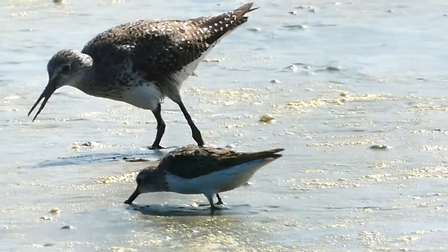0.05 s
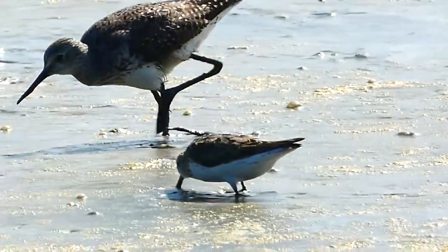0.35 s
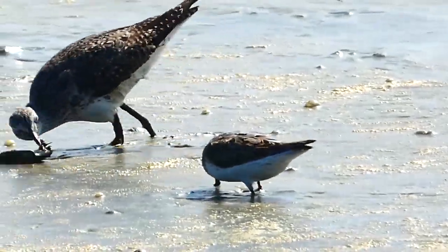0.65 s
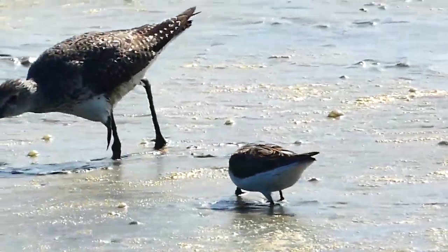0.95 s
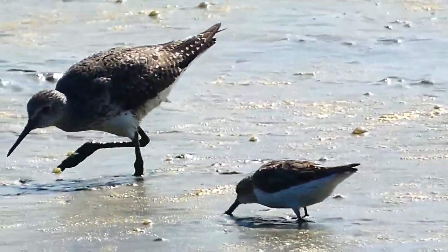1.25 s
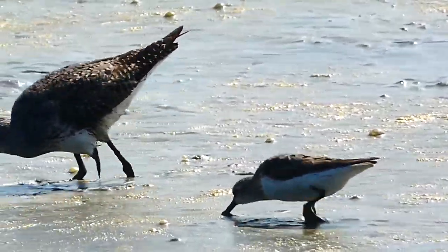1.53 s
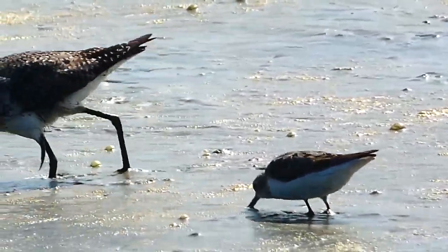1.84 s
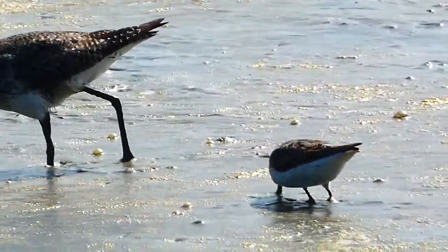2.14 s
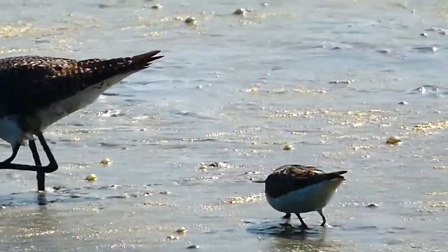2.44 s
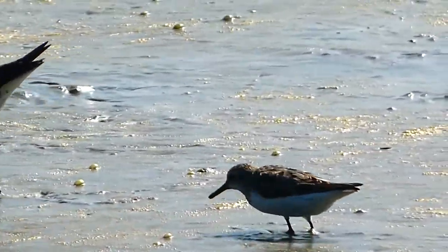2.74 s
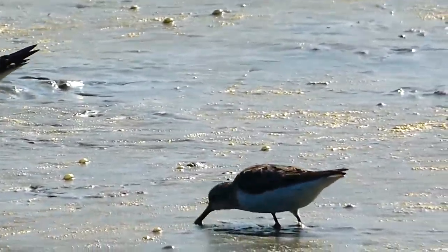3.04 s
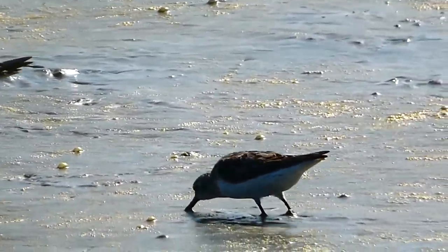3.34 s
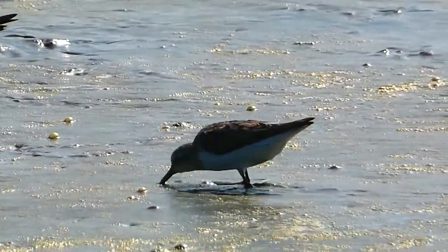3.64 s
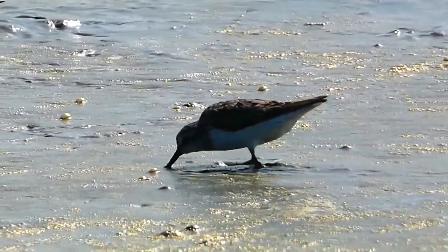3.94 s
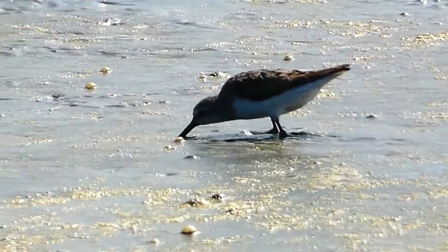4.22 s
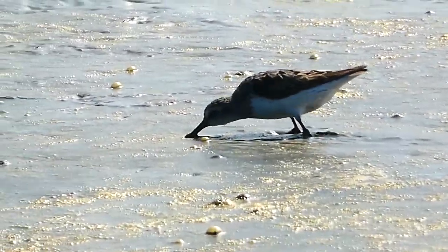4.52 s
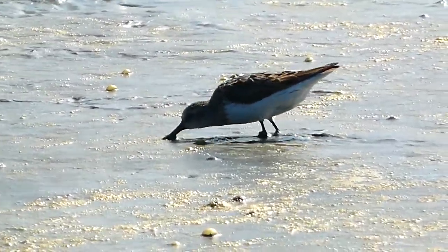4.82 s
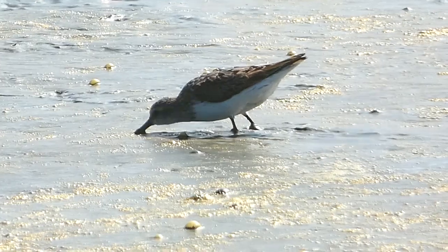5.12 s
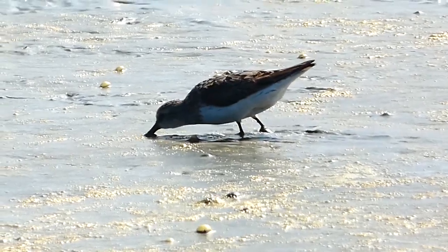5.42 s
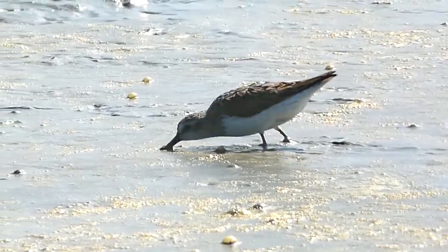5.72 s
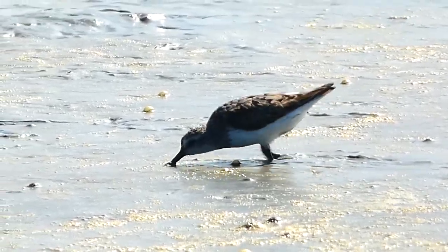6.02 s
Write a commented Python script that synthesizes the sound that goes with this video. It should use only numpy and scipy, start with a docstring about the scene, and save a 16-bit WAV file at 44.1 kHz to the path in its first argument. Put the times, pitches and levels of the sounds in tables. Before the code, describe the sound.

Gusty wind rumbles and thumps on the microphone over a soft hiss, while a distant bird gives faint, buzzy falling whistles.

```python
"""Wind buffets a microphone on an open mudflat: gusts rumble, and their eddies (small swirls of air)
land as low thumps and sharp puffs. Behind them, wind hisses in vegetation and a hollow drone hums like
far traffic. All of these are shaped noise. A distant bird gives buzzy falling whistles that echo
faintly off the shore. A soft knock, a dry tick and a high sizzle each come once."""
import sys
import numpy as np
from scipy import signal
from scipy.fft import rfft, irfft
from scipy.io import wavfile

SR = 44100
rng = np.random.default_rng(int(sys.argv[2]) if len(sys.argv) > 2 else 0)


def dump(signal):
    """Clip the signal to [-1, 1] and save it as 16-bit WAV at the path in sys.argv[1]."""
    limited = np.clip(np.atleast_2d(signal).T, -1, 1)
    pcm = np.round(limited * 32767).astype(np.int16)
    wavfile.write(sys.argv[1], SR, pcm)


N = 267687
TIME = np.arange(N) / SR
FREQ = np.fft.rfftfreq(N, 1 / SR)


def amp(db):
    """Turns decibels into a number to multiply by."""
    return 10 ** (np.asarray(db) / 20)


def unit(x):
    """Scales a sound to an average (rms) level of 1."""
    return x / np.sqrt(np.mean(x ** 2) + 1e-20)


def over_freq(rows):
    """Joins a table's points into a curve over frequency, on a log scale."""
    hz, value = np.transpose(rows)
    return np.interp(np.log(FREQ + 1), np.log(hz), value)


def over_time(rows):
    """Joins a table's points into a curve over time."""
    return np.interp(TIME, *np.transpose(rows))


def bumps(rows):
    """Smooth bell-shaped swells added up, in dB."""
    return sum(db * np.exp(-((TIME - s) / half) ** 2) for s, half, db in rows)


def pan(db):
    """Left and right gains at constant power; a positive pan means the left is louder."""
    gains = amp(np.array([[.5], [-.5]]) * db)
    return gains / np.sqrt(np.mean(gains ** 2, 0))


def noise_pair(likeness, size=len(FREQ)):
    """Left and right noise spectra: likeness 1 is the same, 0 unrelated, -1 opposite."""
    a, b = rng.standard_normal((2, size)) + 1j * rng.standard_normal((2, size))
    return np.array([a, likeness * a + np.sqrt(1 - likeness ** 2) * b])


def band_level(spectra, low_hz, high_hz):
    """Level of the left-right average between two frequencies."""
    return irfft(spectra.mean(0) * (FREQ > low_hz) * (FREQ < high_hz), N).std()


def wander(rate_hz):
    """A smooth random wobble; a higher rate makes it quicker."""
    return unit(irfft(rfft(rng.standard_normal(N)) * np.exp(-(FREQ / rate_hz) ** 2), N))


def add(mix, s, sound):
    """Mixes a stereo sound in at s seconds."""
    part = mix[:, max(round(s * SR), 0):][:, :sound.shape[1]]
    part += sound[:, :part.shape[1]]


# The broad noise under the drone: (frequency [Hz], relative level [dB])
DRONE_TONE = [(25, -27), (60, -15), (110, -4), (280, -6.5), (470, -3.5), (640, -6), (900, -1), (1060, -6.5),
              (1400, -16), (1800, -27), (3000, -36)]
# Where it rings: (frequency [Hz], width [Hz], relative level [dB], pan [dB], left-right likeness)
DRONE_RINGS = [(402, 44, 5.5, -4, .85), (436, 42, 9, -6, .85), (560, 60, -5, 5, 0),
               (740, 60, -.5, -11, -.6), (800, 46, 2.3, -2, .3), (990, 50, 4.3, -3, .75),
               (1128, 42, 2, 0, .6), (1215, 45, -4, 0, .5), (1318, 55, -6.5, 5, .5), (1585, 60, -8, 1, .7),
               (1668, 52, -1.2, 1, .95)]
# The drift of its low hum: (time [s], boost [dB])
HUM_DRIFT = [(.3, 3), (.8, 1.5), (1.42, 3.5), (1.6, 0), (2.35, -0.5), (2.75, 3.5), (3.0, 1), (3.9, 2),
             (4.7, 0.5), (5.5, 1.5), (5.9, -4.5)]
# Swells of its upper part: (middle [s], half length [s], boost [dB])
DRONE_SWELLS = [(1.31, 0.046, 4.3), (1.78, 0.037, 5.9), (4.78, 0.035, 2.3), (4.94, .015, 6.3),
                (5.04, 0.018, 8.5), (5.96, 0.071, 0.5)]

def drone(level_db=-53.5, waver_db=2.08, split_hz=560):
    """Far noise ringing at a few pitches; the low hum drifts and the upper part swells."""
    spectra = noise_pair(0.062) * amp(over_freq(DRONE_TONE))
    for hz, width, db, pan_db, likeness in DRONE_RINGS:
        peak = amp(db) / (1 + 2 * ((FREQ - hz) / width) ** 2)
        spectra += noise_pair(likeness) * pan(pan_db) * peak
    spectra /= band_level(spectra, 750, 1800)
    low = 1 / (1 + (FREQ / split_hz) ** 8)
    hum = irfft(spectra * low, N) * amp(over_time(HUM_DRIFT))
    upper = irfft(spectra * (1 - low), N) * amp(bumps(DRONE_SWELLS)) * pan(0.1)
    return (hum + upper) * amp(level_db + waver_db * wander(rate_hz=44))


# The tone of the hissing plants: (frequency [Hz], relative level [dB])
HISS_TONE = [(600, -35), (1400, 1), (2200, 2), (3300, 2), (4800, 0.5), (6800, -1), (8200, -4), (9900, -2.5),
             (12000, -9.5), (15300, -17.5)]
# How alike the hiss is in both ears: (frequency [Hz], left-right likeness)
HISS_LIKENESS = [(1500, 0.24), (2500, 0.57), (4000, 0.72), (6800, 0.75), (10000, 0.59), (12500, 0.37),
                 (15000, .25)]
# Its rise and fall: (time [s], base level [dB])
HISS_LEVEL = [(.3, -56.5), (.55, -56), (.85, -52.5), (1.15, -53), (1.65, -55), (2.5, -55.5), (3.1, -56.5),
              (3.35, -59), (4, -58), (4.45, -55.5), (5.1, -57), (5.7, -55), (6.05, -57.5)]
# Its slight lean to the left: (time [s], pan [dB])
HISS_PAN = [(0.33, 0.5), (0.65, 2), (3.95, 1.0), (4.33, 0), (5.38, 1), (6.05, 0.5)]

def plant_hiss(low_hz=3300, top_hz=8400, top_db=-5.5, flicker_db=0.67):
    """Wind in vegetation: a smooth hiss that swells with the gusts, its fine top spread wide."""
    level_db = over_time(HISS_LEVEL)
    swell_db = level_db - level_db.mean()
    spectra = noise_pair(over_freq(HISS_LIKENESS)) * amp(over_freq(HISS_TONE))
    top = 1 / (1 + (top_hz / (FREQ + 1)) ** 8)
    low = 1 / (1 + (FREQ / low_hz) ** 8)
    wash = irfft(spectra * low, N) * amp(-0.5 * swell_db)  # the low part swells half as much
    middle = irfft(spectra * (1 - top - low), N)
    body = (wash + middle) / band_level(spectra, 4000, 8000)
    fizz = irfft(spectra * top, N) / band_level(spectra, 9000, 14000)
    hiss = body * pan(over_time(HISS_PAN)) + fizz * amp(top_db)
    return hiss * amp(level_db + flicker_db * wander(rate_hz=25))


# A faint sizzle: (middle [s], half length [s], level [dB])
SIZZLES = [(6.04, 0.055, -60)]

def sizzle(hz=9400, width_hz=1100):
    """A brief narrow hiss high in the treble."""
    hiss = unit(irfft(noise_pair(0.66) * np.exp(-((FREQ - hz) / width_hz) ** 2), N))
    return hiss * sum(amp(db) * np.exp(-((TIME - s) / half) ** 2) for s, half, db in SIZZLES)


def shore_echoes(sound, fade_60db_s=0.92, echo_db=-12, size=22050):
    """Adds faint scattered echoes from the shore."""
    tail = rng.standard_normal((2, size)) * amp(-60 * np.arange(size) / SR / fade_60db_s)
    tail /= np.linalg.norm(tail[0])
    return sound + amp(echo_db) * signal.fftconvolve(sound, tail, axes=1)[:, :N]


# The bird's calls: (start [s], length [s], relative level [dB], first pitch [Hz], held pitch [Hz],
# last pitch [Hz], pan [dB], fade by the end [dB])
BIRD_CALLS = [(1.92, .09, -53, 3230, 3260, 2620, 8, -4), (2.285, .14, -63.5, 2760, 2740, 2660, 3, -3),
              (3.27, .14, -60.5, 2850, 2660, 2580, 3, -2), (3.525, .24, -55.8, 2950, 2620, 2320, 11, -4),
              (4.16, .11, -61.5, 3650, 3150, 2900, 0, -3), (4.28, .135, -54.7, 2700, 2770, 2440, -2, 0),
              (4.43, .245, -54.3, 3520, 2690, 2560, 8, -8), (4.675, .075, -62, 3900, 3700, 3520, 0, -2),
              (5.165, .25, -60, 3850, 2720, 2650, 0, -2)]

def bird(buzz_hz=107, buzz_depth=1.5, swing_hz=75, jitter_hz=46, rough_db=-0.5, gain_db=-2):
    """A whistle that drops, holds and droops as it fades, chopped into a fast rough trill."""
    out, jitter, rough = np.zeros((2, N)), wander(rate_hz=220), wander(rate_hz=80)
    rise_share, fall_s = 0.15, 0.0074
    for s, length, db, first, held, last, pan_db, fade_db in BIRD_CALLS:
        t = np.arange(int(length * SR)) / SR
        progress = t / length
        now = slice(int(s * SR), int(s * SR) + len(t))
        buzz = 2 * np.pi * (buzz_hz * t + rng.random())
        hz = held + (first - held) * np.exp(-progress / .19) + (last - held) * progress ** 4
        hz += swing_hz * np.sin(buzz) + jitter_hz * jitter[now]
        whistle = np.sin(2 * np.pi * np.cumsum(hz) / SR)
        chop = np.maximum(1 + buzz_depth * np.cos(buzz), 0)
        effort = np.minimum(progress / rise_share, (length - t) / fall_s).clip(max=1)
        fade = amp(fade_db * progress ** 2 + rough_db * rough[now])
        add(out, s, amp(db + gain_db) * pan(pan_db) * unit(whistle * chop * effort * fade))
    return out


# A small tick: (time [s], peak level [dB])
TICKS = [(3.257, -39)]

def tick(hz=1900, decay_s=0.0018, size=600):
    """A short dry snap of noise on the left."""
    out, t = np.zeros((2, N)), np.arange(size) / SR
    band = signal.butter(3, [hz * .7, hz * 1.3], "band", fs=SR, output="sos")
    for s, db in TICKS:
        snap = signal.sosfilt(band, rng.standard_normal(size) * np.exp(-t / decay_s))
        add(out, s, amp(db) * pan(12) * snap / abs(snap).max())
    return out


# A soft knock on the microphone's case: (time [s], peak level [dB])
KNOCKS = [(1.954, -35)]

def knock(push_s=0.0012, size=2048):
    """A dull bump: the case is pushed once and eases back."""
    out, age = np.zeros((2, N)), np.arange(size) / SR / push_s
    push = age * (1 - age / 2) * np.exp(-age)
    for s, db in KNOCKS:
        add(out, s, amp(db) * pan(6) * push / push.max())
    return out


def rumble(hz, size, likeness, low_slope=1.54, high_slope=2.97, cut_share=0.62):
    """Churning air: noise strongest near hz; bigger slopes make it fall off faster on each side."""
    f = np.fft.rfftfreq(size, 1 / SR) + 1
    ratio = f / (0.86 * hz)
    hump = 1 / np.sqrt((1 + ratio ** (-2 * low_slope)) * (1 + ratio ** (2 * high_slope)))
    bass_cut = 1 / (1 + (cut_share * hz / f) ** 2)
    return unit(irfft(noise_pair(likeness, len(f)) * hump * bass_cut, size))


def mic_bass_cut(sound, hz=52):
    """The microphone passes little of the wind's deepest pressure."""
    return irfft(rfft(sound) / np.sqrt(1 + (hz / (FREQ + 1)) ** 4), N)


# Puffs of air in the late gusts: (time [s], peak level [dB], pan [dB])
PUFFS = [(4.958, -35, -10), (5.167, -35, 10), (5.290, -28.5, 6), (5.301, -28, 4), (5.313, -22, 3),
         (5.418, -28.5, -9), (5.432, -28, 4), (5.460, -33.5, -10), (5.659, -34.5, -14), (5.737, -33, -4)]

def puffs(hz=720, decay_s=0.0033, size=2048):
    """Eddies break on the microphone's rim in short, sharp puffs."""
    out, t = np.zeros((2, N)), np.arange(size) / SR
    burst = (1 - np.exp(-4 * t / decay_s)) * np.exp(-t / decay_s)
    for s, db, pan_db in PUFFS:
        air = rumble(hz, size, likeness=0.13, high_slope=5.4) * burst
        add(out, s, amp(db) * pan(pan_db) * air / abs(air).max())
    return out


# The hardest swirls of air: (start [s], length [s], level [dB], rough pitch [Hz], pan [dB])
EDDIES = [(0.727, 0.036, -31.5, 106, 1), (0.787, 0.048, -31.5, 112, 0), (0.87, 0.05, -37.5, 163, 3),
          (1.013, 0.035, -37.5, 115, 3), (1.098, 0.012, -34, 130, 0), (1.119, 0.049, -32.5, 171, 4),
          (1.181, 0.021, -38, 174, -2), (1.463, 0.029, -41, 118, -10), (1.585, 0.018, -37, 135, 3),
          (1.612, 0.032, -40, 150, 2), (2.341, 0.017, -44, 109, 0), (2.939, 0.027, -44.5, 95, -2),
          (3.019, 0.02, -37.5, 114, 0), (3.347, .014, -31.5, 81, 2), (3.362, 0.0096, -25.5, 154, 11),
          (3.831, 0.024, -43, 92, 2), (3.986, 0.0188, -24, 185, -1), (4.034, 0.02, -30, 222, -6.5),
          (4.083, 0.014, -34.5, 144, -5), (4.153, 0.015, -34.5, 147, 2), (4.184, 0.035, -34.5, 174, 0.5),
          (4.228, 0.017, -34.5, 250, 16), (4.264, 0.01, -26.5, 205, 6), (4.283, 0.0073, -31.5, 325, -10),
          (4.296, 0.013, -26, 305, 2.5), (4.375, 0.014, -34.5, 205, 9), (4.402, 0.02, -33, 230, -2),
          (4.497, 0.011, -36.5, 205, 4), (4.533, 0.016, -33, 220, 4), (4.633, 0.0113, -43.5, 191, 0),
          (4.926, 0.012, -39.5, 179, -2), (4.955, 0.01, -23.5, 276, -1.5), (4.972, 0.02, -33.5, 287, 0),
          (5.162, 0.011, -30.5, 282, 4), (5.201, .014, -36.5, 320, -10), (5.245, .02, -34.5, 360, -5),
          (5.288, 0.0077, -29, 287, 12), (5.296, 0.0077, -33, 310, 4), (5.309, 0.012, -35.5, 280, -7),
          (5.324, 0.0222, -34, 398, -11), (5.354, 0.028, -36, 273, 1), (5.415, 0.022, -33.5, 295, 2),
          (5.456, 0.01, -32.5, 288, -6), (5.654, 0.013, -31.5, 296, -7), (5.733, 0.019, -34.5, 238, 1)]

def eddies(cut_share=0.5, size=8192):
    """Each eddy thumps with a few cycles of rumble; smaller ones sound higher and thinner."""
    out, t = np.zeros((2, N)), (np.arange(size) - size / 2) / SR
    f = np.fft.rfftfreq(size, 1 / SR) + 1
    for s, length, db, hz, pan_db in EDDIES:
        likeness = np.interp(hz, [150, 380], [.9, .25])  # small eddies hit each side differently
        swell = 1 / np.sqrt(1 + (t / (.45 * length)) ** 8)
        thump = rumble(hz, size, likeness, low_slope=2.5, high_slope=4.15) * swell
        thump = irfft(rfft(thump) / np.sqrt(1 + (cut_share * hz / f) ** 6), size)  # trim the bass
        thump /= np.sqrt(np.sum(thump ** 2, axis=1, keepdims=True) / (length * SR))
        add(out, s + length / 2 + t[0], amp(db) * pan(pan_db) * thump)
    return out


# Gusts passing the microphone: (start [s], length [s], relative level [dB])
GUSTS = [(0.284, 0.044, -45.5), (0.57, .06, -46), (0.62, 0.58, -40.5), (1.196, 0.14, -47.5),
         (1.454, 0.086, -57), (1.589, 0.044, -43.5), (2.058, 0.2, -50.5), (2.36, 0.12, -45),
         (2.937, 0.2, -53), (3.34, 0.051, -45), (3.835, .15, -54), (3.978, 0.082, -40),
         (4.143, 0.198, -43.5), (4.357, 0.22, -49), (4.927, 0.19, -47), (5.186, 0.29, -41.5),
         (5.523, 0.27, -45), (6.051, .06, -51)]
# The rumble grows higher and thinner in the later gusts: (time [s], target pitch [Hz])
GUST_PITCH = [(.3, 105), (.8, 115), (1.15, 154), (1.6, 148), (2.2, 114), (3, 92.6), (3.35, 119),
              (3.84, 108), (4, 176), (4.5, 223), (5.35, 300), (5.8, 235)]

def gusts(rise_s=0.02, fall_s=0.028, calm_db=-66.5, lumpy_db=2.5, gain_db=1.0):
    """Gusts of lumpy, churning air rise, hold and fall back to a quiet rumble."""
    level = amp(calm_db)
    for s, length, db in GUSTS:
        before = np.maximum(s - TIME, 0) / rise_s
        after = np.maximum(TIME - s - length, 0) / fall_s
        level = np.maximum(level, amp(db) * np.exp(-before - after))
    low_hz, mid_hz, high_hz = 108, 168, 258
    rumbles = [rumble(low_hz, N, likeness=0.82),
               rumble(mid_hz, N, likeness=0.65, high_slope=3.9),
               rumble(high_hz, N, likeness=0.45, low_slope=1.96, high_slope=3.8, cut_share=0.54)]
    hz = over_time(GUST_PITCH)  # steers the blend of the three rumbles
    shares = [np.interp(hz, [low_hz, mid_hz, high_hz], row) for row in np.eye(3)]
    air = sum(np.sqrt(share) * noise for share, noise in zip(shares, rumbles))
    return amp(gain_db) * level * unit(air * amp(lumpy_db * wander(rate_hz=36)))


# Brief dips in the background's level: (middle [s], half length [s], drop [dB])
BACKGROUND_DIPS = [(5.335, 0.095, 5.7), (5.5, 0.17, 2.9), (5.77, 0.12, 4.3)]

def scene():
    """Near wind over the distant sounds."""
    wind = mic_bass_cut(eddies() + puffs() + gusts())
    background = (drone() + plant_hiss() + sizzle()) * amp(-bumps(BACKGROUND_DIPS))
    return wind + background + shore_echoes(bird()) + tick() + knock()


def record(dry, start_s=0.3005, top_hz=15600):
    """The sound cuts in after a short silence, with its highest treble removed."""
    treble_cut = signal.firwin(401, top_hz, window=("kaiser", 8), fs=SR)
    return signal.oaconvolve(dry * (TIME > start_s), treble_cut[None], "same")


dry = scene()
out = record(dry)
dump(out)
```